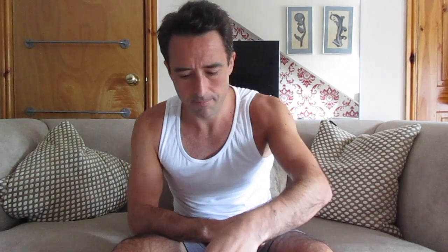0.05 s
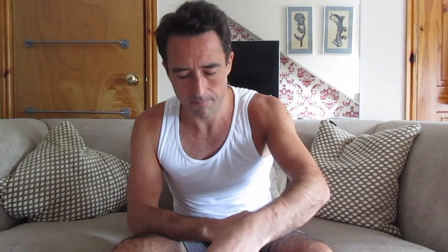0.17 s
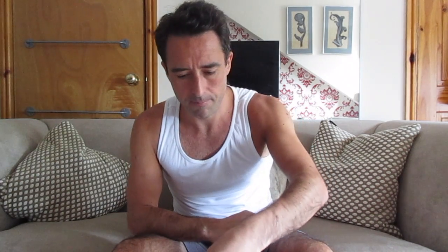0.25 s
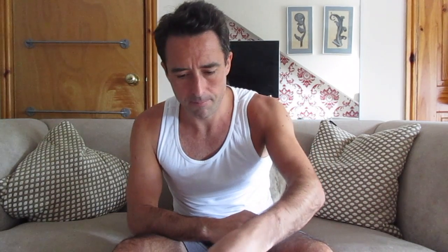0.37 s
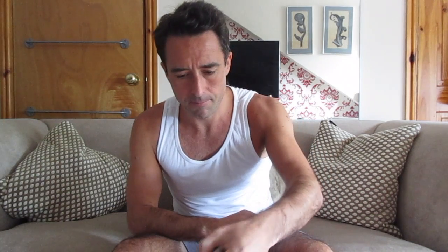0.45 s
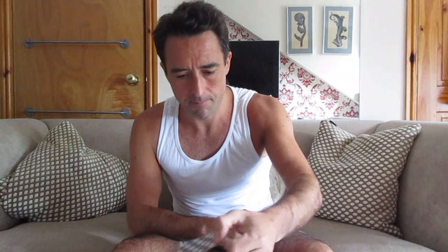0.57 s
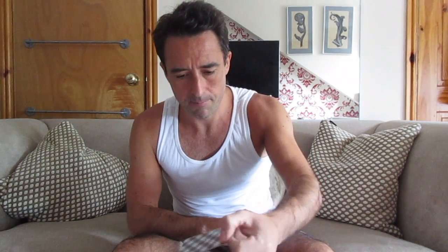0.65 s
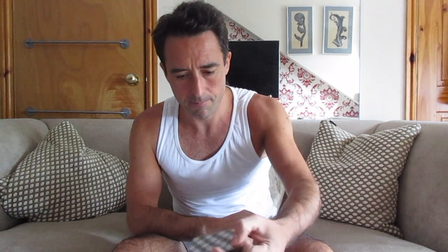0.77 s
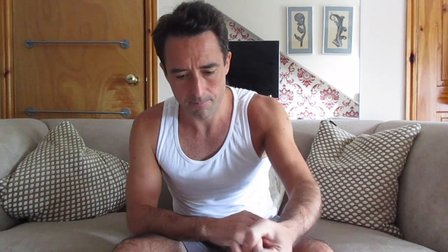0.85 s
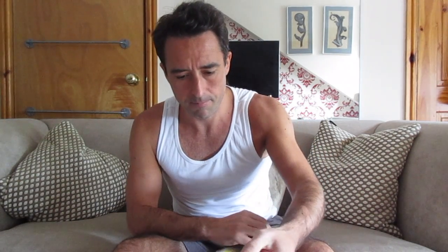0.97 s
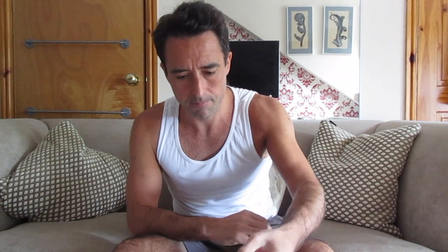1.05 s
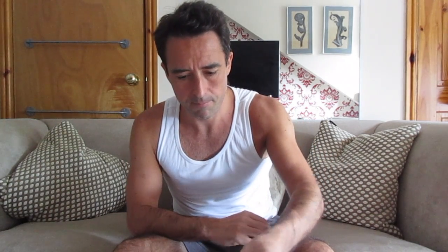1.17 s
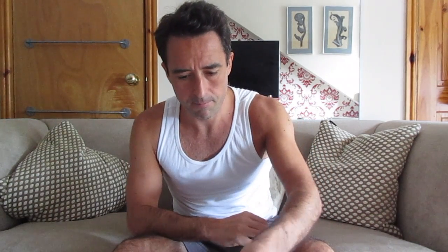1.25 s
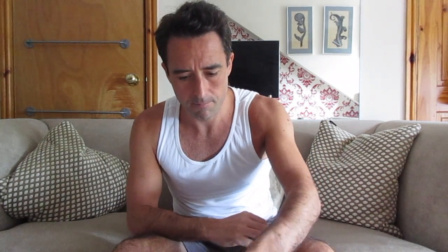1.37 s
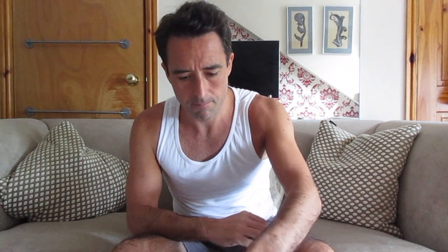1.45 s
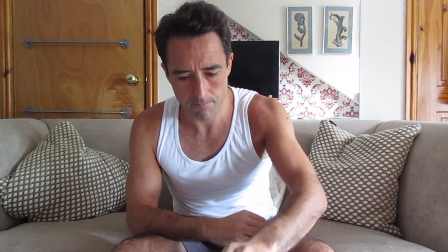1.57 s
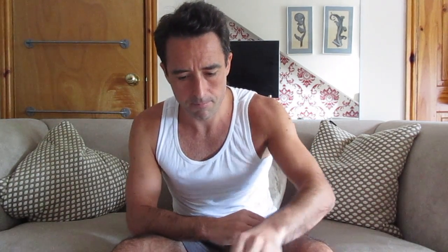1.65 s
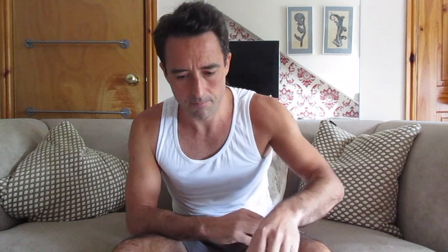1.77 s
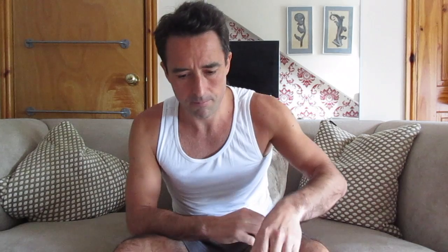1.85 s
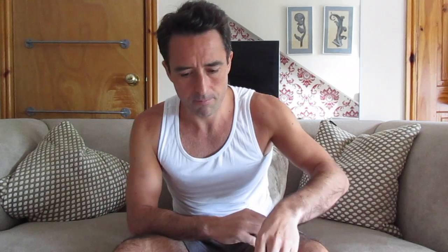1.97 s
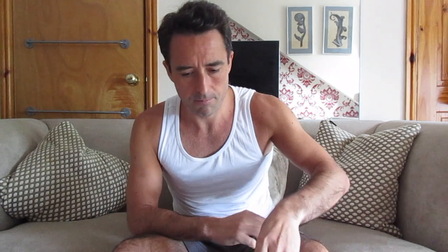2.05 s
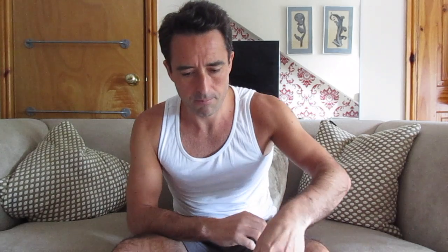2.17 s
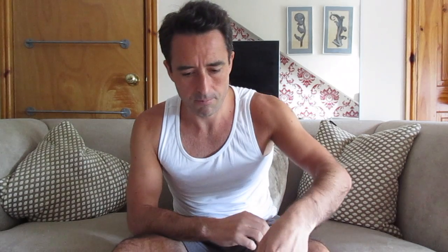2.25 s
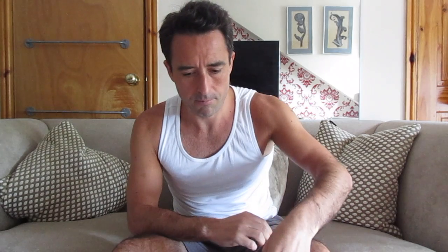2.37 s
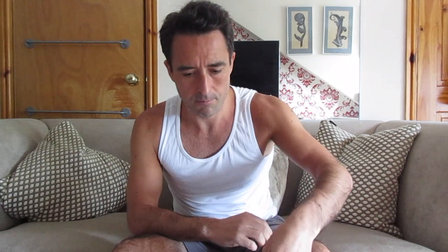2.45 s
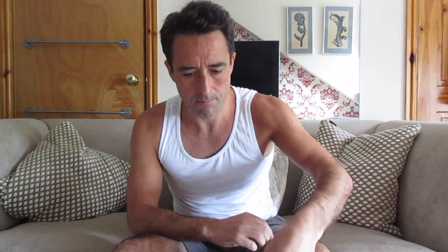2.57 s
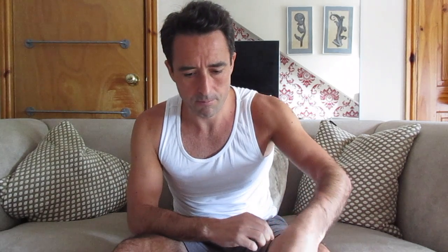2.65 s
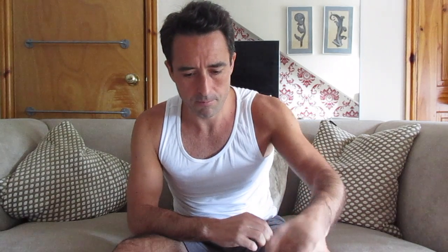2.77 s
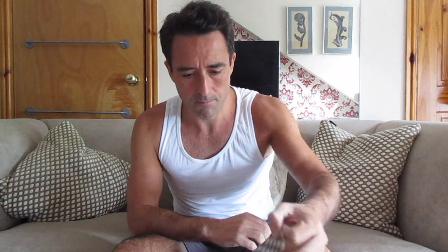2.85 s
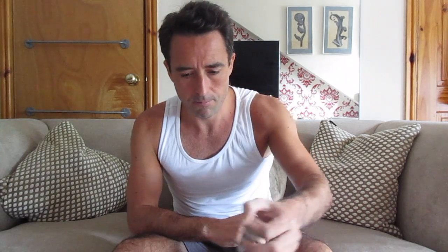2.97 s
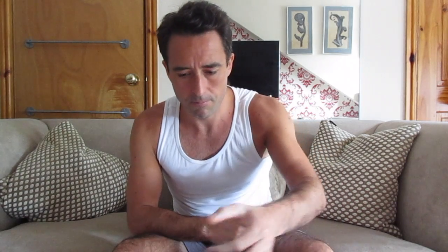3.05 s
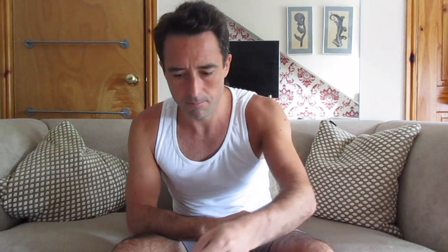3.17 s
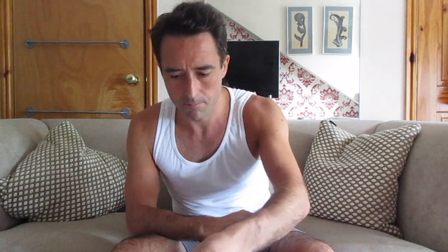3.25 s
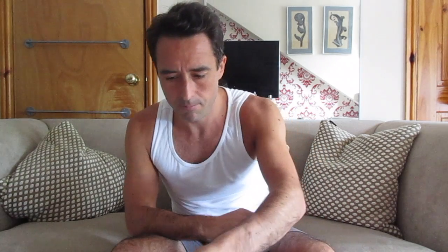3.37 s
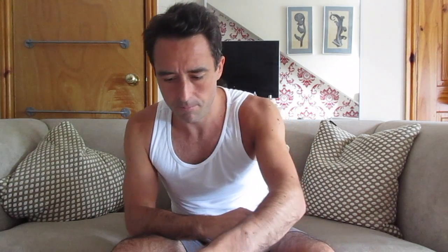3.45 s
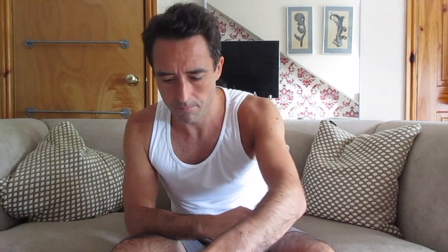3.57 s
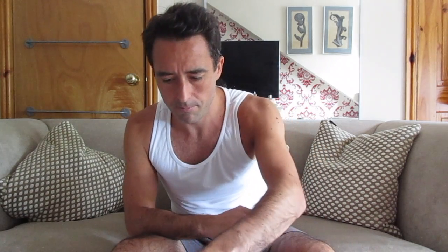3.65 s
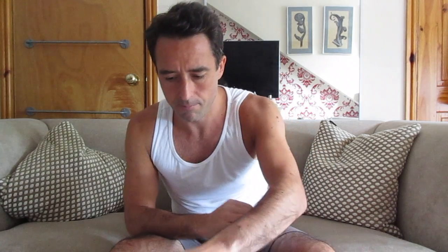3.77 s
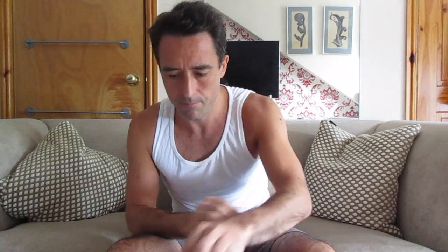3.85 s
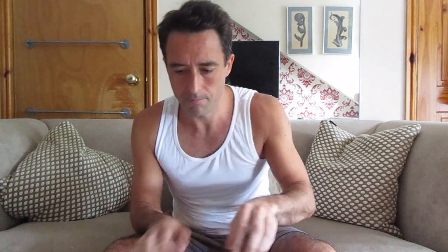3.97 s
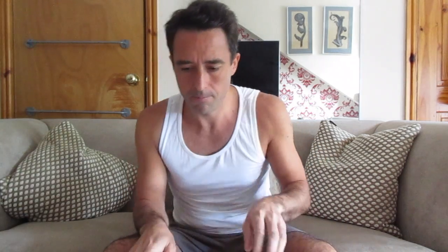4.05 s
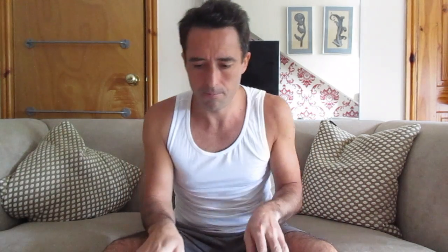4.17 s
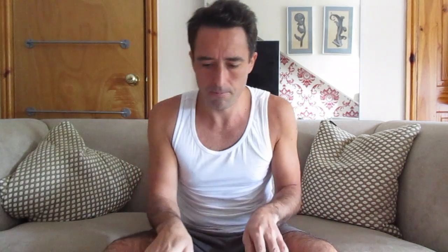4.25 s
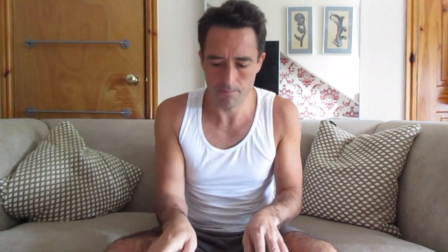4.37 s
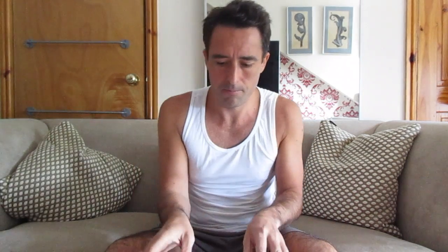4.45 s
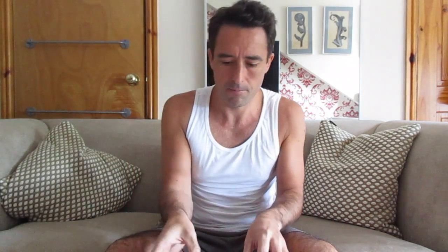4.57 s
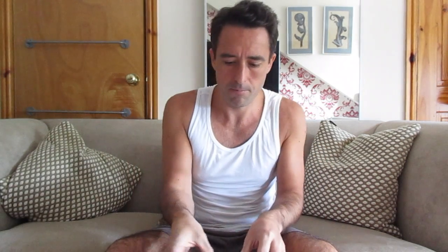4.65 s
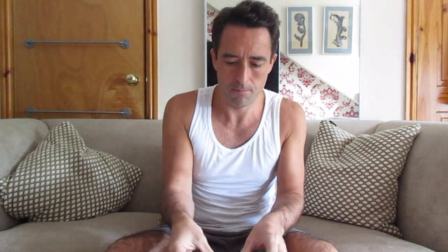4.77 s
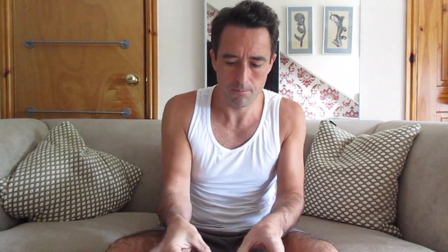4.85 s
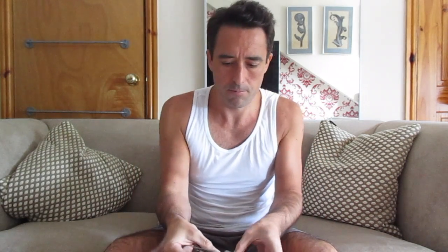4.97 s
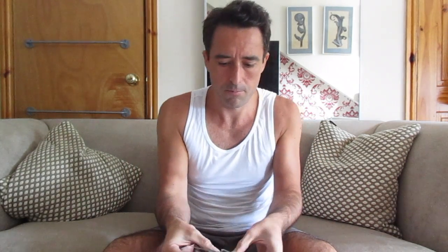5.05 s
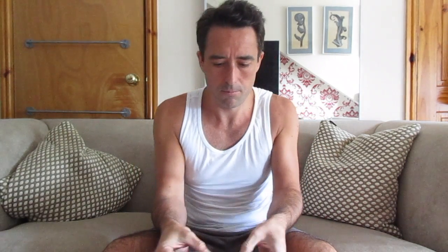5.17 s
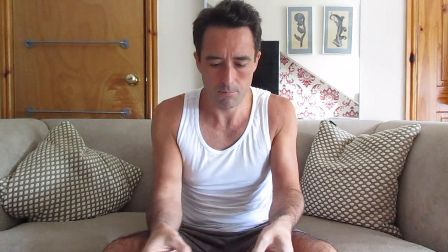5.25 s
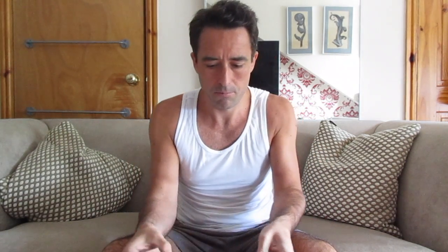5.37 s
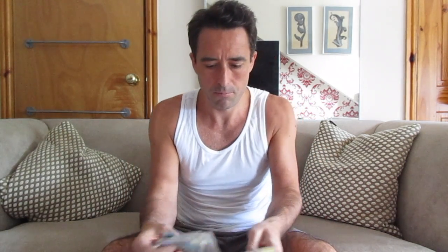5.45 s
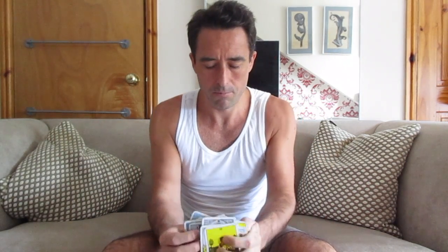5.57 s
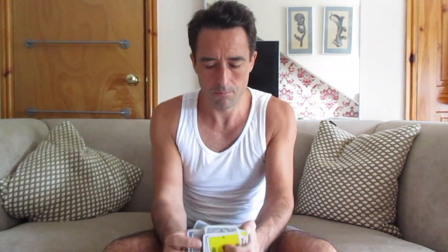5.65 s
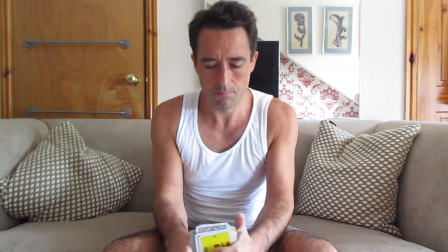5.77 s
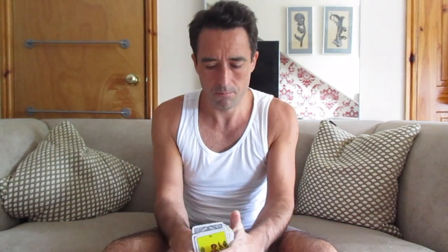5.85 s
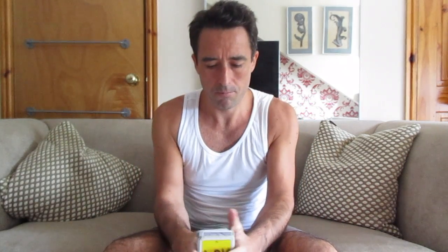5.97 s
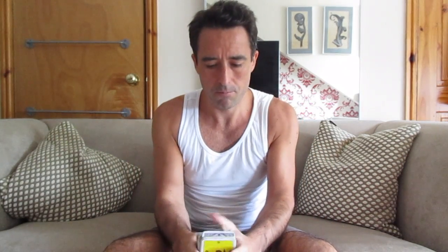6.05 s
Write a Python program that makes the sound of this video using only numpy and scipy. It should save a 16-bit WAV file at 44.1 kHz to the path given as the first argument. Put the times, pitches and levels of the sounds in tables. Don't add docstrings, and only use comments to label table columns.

```python
import sys
import numpy as np
from scipy import signal
from scipy.fft import rfft, irfft
from scipy.io import wavfile
from scipy.ndimage import uniform_filter1d

SR = 44100
rng = np.random.default_rng(int(sys.argv[2]) if len(sys.argv) > 2 else 0)


def makeup_ratio(level_db):
    decades = np.asarray(level_db, float) / 20
    return 10 ** decades


def to_wav(sig):
    pcm = np.clip(np.atleast_2d(sig), -1, 1) * 32767
    pcm = np.round(pcm).astype(np.int16)
    wavfile.write(sys.argv[1], SR, pcm.T)


N = 269892

# pitch_hz, level_db (per Hz)
FIZZ = [(300, 0), (1000, 1.5), (2500, -2), (5000, -1.5), (8000, -5), (11000, -10), (15000, -18.5)]
# pitch_hz, level_db, t60_s (time to die by 60 dB)
TABLE_MODES = [(250, -14, 0.074), (408, -4, 0.1), (483.4, 4.5, 0.14), (515, 1, 0.18), (655, -2, 0.12),
               (701, 5, 0.09), (744, 10, 0.053), (809, 4.5, 0.063), (1124, 6.5, 0.03), (1087, -1, 0.12),
               (1175, -2, 0.12)]


def evened(x):
    return x / np.sqrt(np.mean(x ** 2) + 1e-20)


def read(points, hz):
    point_hz, value = np.transpose(points)
    return np.interp(np.log(hz + 1), np.log(point_hz + 1), value)


def coloured(x, points):
    gain = makeup_ratio(read(points, np.fft.rfftfreq(len(x), 1 / SR)))
    return irfft(rfft(x) * gain, len(x))


def add(mix, s, sound):
    part = mix[round(s * SR):][:len(sound)]
    part += sound[:len(part)]


def resonate(x, hz, width_hz):
    turn = np.exp(2j * np.pi * np.cumsum(hz * np.ones(len(x))) / SR)
    r = np.exp(-np.pi * width_hz / SR)
    smooth = signal.lfilter([1 - r], [1, -r], x / turn)
    return 2 * (turn * smooth).real


def ring(modes, extra_db=0, rise_ms=0.073, size=6000):
    t = np.arange(size) / SR
    hz, db, t60 = np.transpose(modes)[:, :, None]
    wide_gap = np.diff(np.log(hz), axis=0, prepend=0) > .17
    sign = (-1.) ** np.cumsum(wide_gap, axis=0)
    tones = sign * makeup_ratio(db + extra_db - 60 * t / abs(t60)) * np.sin(2 * np.pi * hz * t)
    out = tones.sum(0) * (1 - np.exp(-(1000 * t / rise_ms) ** 2))
    return out / abs(out).max()


def puff(t, t60):
    return evened(coloured(rng.standard_normal(len(t)), FIZZ)) * makeup_ratio(-60 * t / t60)


def swell(rows, t):
    s, db, rise_ms, fall_ms = np.transpose(rows)[:, :, None]
    ms = 1000 * (t - s)
    away = np.where(ms < 0, -ms / np.maximum(rise_ms, 2), ms / np.maximum(fall_ms, 2))
    return np.sqrt((makeup_ratio(db - 10 * away) ** 2).sum(0))


def background():
    # pitch_hz, level_db (per Hz)
    hiss_colour = [(13, -33), (22, 7), (64, -10), (111, -3), (370, -11.5), (1050, -14.5), (3060, -23),
                   (15400, -33.5)]
    # pitch_hz, width_hz, level_db (rms)
    low_hum = (43.5, 7, -58)
    # pitch_hz, level_db (rms)
    whine_tones = [(7854, -74), (7881, -77), (7940, -76), (7973, -84), (8032, -94), (8091, -79)]
    hiss_db = -50.5
    t = np.arange(N) / SR
    rates_hz = np.geomspace(.3, 12, 24)
    drift = evened(sum(np.sin(2 * np.pi * (f * t + rng.random())) / np.sqrt(f) for f in rates_hz))
    hiss = makeup_ratio(hiss_db + .6 * drift) * evened(coloured(rng.standard_normal(N), hiss_colour))
    hum_hz, hum_width_hz, hum_db = low_hum
    hum = makeup_ratio(hum_db) * evened(resonate(rng.standard_normal(N), hum_hz, hum_width_hz))
    whine = np.zeros(N)
    for hz, db in whine_tones:
        whine += np.sqrt(2) * makeup_ratio(db) * np.sin(2 * np.pi * (hz * t + rng.random()))
    return hiss + hum + whine


def strokes():
    # peak_s, level_db, rise_ms, fall_ms
    glides = [(.175, -48.5, 34, 60), (.34, -41.5, 33, 43), (.49, -47.5, 91, 31), (.825, -47.5, 33, 24),
              (.94, -35, 7.9, 10.4), (1.36, -47, 25, 44), (1.435, -37.5, 13.4, 14), (1.51, -44, 34, 12),
              (1.98, -55, 62, 63), (2.165, -52, 51, 60), (2.54, -51, 130, 92), (2.74, -45, 86, 27),
              (2.845, -47.5, 11, 31), (3.04, -41.5, 30, 55), (3.37, -47, 30, 45), (3.575, -57, 65, 30),
              (3.675, -49, 14, 50), (3.76, -54, 38, 33), (3.95, -57.5, 170, 70)]
    # peak_s, level_db, rise_ms, fall_ms, gap_hz
    scrapes = [(.19, -52, 30, 23, 2400), (.245, -46.5, 12, 10, 2200), (.335, -43.5, 28, 24, 2260),
               (.385, -48.5, 37, 21, 2830), (.425, -45, 32, 30, 2190), (.826, -49, 22, 64, 1780),
               (0.955, -43, 17, 21, 1860), (1.39, -42.5, 42, 42, 2100), (1.43, -40, 15, 14, 2570),
               (3.644, -35.5, 6.8, 6.1, 1600), (2.76, -45.5, 22, 14, 2220), (2.843, -42, 6.6, 15, 2100),
               (3.045, -48, 20, 10, 1830), (3.37, -51, 30, 99, 2100), (3.585, -41, 46, 12, 2050),
               (3.654, -35, 17, 18, 2400), (4.55, -49, 124, 64, 2350), (4.67, -61, 44, 120, 2250),
               (4.95, -40, 9.9, 35, 2660), (5.225, -51, 27, 50, 1600), (5.56, -42, 14, 29, 2530),
               (5.635, -49, 6.9, 13.5, 2020), (5.795, -43.5, 66, 55, 1590), (5.975, -39.5, 6.7, 47, 1690)]
    # peak_s, level_db, rise_ms, fall_ms
    drags = [(.44, -47, 28, 30), (.485, -43.5, 20, 12), (.826, -51.5, 40, 56), (1.44, -46, 34, 33),
             (1.97, -55, 41, 33), (2.761, -47, 6.2, 13), (3.36, -53, 20, 66), (3.57, -51, 80, 30),
             (3.645, -46.5, 25, 44), (4.1, -54.5, 110, 170), (4.32, -56, 80, 100), (4.49, -46, 81, 36),
             (4.6, -44, 20, 100), (4.69, -47, 54, 38), (4.9, -42, 56, 21), (4.98, -45, 13, 77),
             (5.2, -55, 9.6, 170), (5.41, -72, 43, 43), (6.03, -40, 53, 54)]
    # peak_s, level_db, rise_ms, fall_ms
    pushes = [(4.189, -49, 10, 29), (4.31, -49, 97, 68), (4.55, -42.5, 63, 210), (4.68, -41, 104, 28),
              (4.85, -55, 60, 130), (4.945, -47.5, 8.2, 39), (5.081, -54.5, 83, 60), (5.21, -48, 35, 72),
              (5.4, -50.5, 80, 105), (5.555, -45, 40, 66), (5.66, -39.5, 50, 22), (5.79, -47.5, 75, 55),
              (5.99, -39.5, 16, 19), (6.115, -50, 92, 20)]
    glide_hz, glide_gap_db = 2100, -12
    push_gap_db, push_drum_db = -8, -14.5
    scrape_fizz_db, scrape_drum_db = -32.5, -32

    slips = rng.standard_normal((3, N)) * makeup_ratio(1.8 * np.minimum(rng.exponential(1, (3, N)), 6))
    clumps = evened(uniform_filter1d(rng.standard_normal((3, N)), 130))
    slips *= makeup_ratio([[1.7], [2.2], [2.6]] * clumps)
    fizz = evened(coloured(slips[0], FIZZ))
    drum = evened(signal.oaconvolve(slips[1], ring(TABLE_MODES))[:N])
    flutter = uniform_filter1d(uniform_filter1d(rng.standard_normal(N), 400), 400)
    wander = 2 ** (.09 * evened(flutter))

    def gap(at, hz):
        hz = hz * wander[at]
        wide = resonate(resonate(slips[2, at], 1690, 1600), 1640, 3600)
        return evened(resonate(resonate(slips[2, at], hz, 600), hz, 1200) + 0.35 * wide)

    t, coarse = np.arange(N) / SR, np.arange(0, N / SR, .001)
    glide, push, drag = (np.interp(t, coarse, swell(rows, coarse)) for rows in (glides, pushes, drags))
    sing = gap(slice(None), glide_hz)
    out = glide * (fizz + makeup_ratio(glide_gap_db) * sing) + drag * drum
    out += push * (fizz + makeup_ratio(push_gap_db) * sing + makeup_ratio(push_drum_db) * drum)
    for *row, hz in scrapes:
        at = slice(max(round((row[0] - .25) * SR), 0), round((row[0] + .3) * SR))
        scrape = gap(at, hz) + makeup_ratio(scrape_fizz_db) * fizz[at] + makeup_ratio(scrape_drum_db) * drum[at]
        out[at] += swell([row], t[at]) * scrape
    return out


def clicks():
    # start_s, peak_db, centre_hz
    catches = [(0.228, -29, 3000), (0.2836, -38, 1900), (0.4824, -20.5, 1580), (0.4945, -34, 1990),
               (0.8954, -37, 2280), (2.6973, -33, 2280), (2.986, -40, 2030), (3.208, -37, 2170),
               (3.544, -40, 1740), (3.6795, -33, 2500), (3.817, -37, 2150), (4.181, -30, 2600),
               (5.2799, -34, 1810), (5.4153, -43, 2420), (1.4252, -29, 1500), (5.4982, -39, 1400),
               (5.5521, -30, 2330), (5.6072, -26.5, 2270), (5.7892, -23, 1830), (5.8744, -29.5, 1490),
               (5.9611, -27, 2610), (5.9698, -22, 2420), (5.9775, -19.5, 2410), (6.0014, -22, 1410),
               (6.0445, -27, 1400), (6.0644, -29.5, 2480)]
    out, t = np.zeros(N), np.arange(400) / SR
    for s, db, hz in catches:
        front = np.cos(2 * np.pi * 6500 * t) * np.exp(-t / .00006) + .25 * puff(t, .006)
        click = np.sin(2 * np.pi * hz * t) * np.exp(-1.1 * hz * t) + 0.53 * front
        add(out, s, makeup_ratio(db) * click / abs(click).max())
    return out


def squeals():
    # start_s, length_ms, level_db, start_hz, end_hz
    slides = [(.302, 22, -48, 1750, 2100), (.318, 26, -44, 2250, 2050), (.356, 36, -49, 2600, 2900),
              (.4, 36, -45, 2500, 2200), (.33, 30, -50, 5200, 5500), (.428, 25, -52, 1500, 1200),
              (3.632, 18, -40, 2300, 1900), (3.645, 18, -33, 2800, 3050), (3.653, 12, -33, 2800, 2350),
              (3.66, 15, -40, 3000, 2900), (3.68, 30, -47, 2900, 3050), (3.57, 16, -50, 3800, 4100),
              (4.534, 24, -40, 2650, 2700), (4.588, 10, -46, 4200, 4150), (4.615, 100, -52, 5000, 4900),
              (4.63, 50, -53, 6700, 6400), (4.63, 60, -47, 2200, 2500), (4.49, 20, -48, 2100, 2300),
              (4.56, 50, -48, 2800, 2650), (5.631, 8, -40, 1500, 1500)]
    width_at_2500_hz, purity = 380, .35
    out = np.zeros(N)
    for s, ms, db, from_hz, to_hz in slides:
        u = np.linspace(0, 1, max(round(ms * SR / 1000), 64))
        hz = from_hz + (to_hz - from_hz) * u
        width = width_at_2500_hz * from_hz / 2500
        fuzz = evened(resonate(resonate(rng.standard_normal(len(u)), hz, width), hz, 2 * width))
        tone = np.sqrt(2) * np.sin(2 * np.pi * np.cumsum(hz) / SR)
        rounded = np.sqrt(np.sin(np.pi * u ** .8))
        add(out, s, makeup_ratio(db) * rounded * evened(purity * tone + fuzz))
    return out


def ticks():
    # start_s, peak_db, pitch_hz
    corners = [(3.671, -40, 10500), (3.6745, -44, 7500), (3.6808, -35, 7000), (3.6843, -36, 7500),
               (3.7425, -38, 9500), (3.746, -40, 7500), (.9345, -36, 9900), (.9385, -40, 11000),
               (.809, -44, 9000), (5.6072, -34, 6000), (5.672, -30, 6500), (5.6868, -24, 6000)]
    out, t = np.zeros(N), np.arange(200) / SR
    for s, db, hz in corners:
        tick = np.sin(2 * np.pi * hz * t) * t * np.exp(-0.7 * hz * t)
        add(out, s, makeup_ratio(db) * tick / abs(tick).max())
    return out


def snaps():
    # start_s, peak_db, ring_hz, t60_s
    crisp = [(0.823, -35.5, 1610, 0.03), (1.425, -28.5, 815, 0.023), (1.436, -36, 1070, 0.011),
             (1.462, -25, 2470, 0.023), (1.527, -32.5, 2900, 0.02), (2.84, -41, 1690, 0.02),
             (3.339, -35.5, 1060, 0.046), (3.366, -47, 2530, 0.03), (5.182, -30.5, 990, 0.028),
             (5.556, -24.5, 2560, 0.024), (6.114, -22, 2340, 0.0081)]
    # start_s, peak_db, ring_hz,
    # t60_s
    soft = [(2.757, -35, 764, 0.06), (0.952, -32.5, 2005, 0.072), (1.103, -31, 1110, 0.013),
            (1.161, -34, 1960, 0.032), (1.25, -23.5, 1040, 0.017), (1.254, -31.5, 1380, 0.023),
            (2.757, -32, 2150, 0.034), (2.764, -25.5, 1463, 0.035), (2.843, -25.5, 1240, 0.025),
            (3.334, -32.5, 1460, 0.021), (3.574, -34.5, 1340, 0.043), (3.672, -35.5, 258, 0.053),
            (3.6598, -27, 2415, 0.012), (4.548, -33, 2600, 0.02), (4.572, -30.5, 1080, 0.045),
            (4.59, -28, 1125, 0.03), (4.608, -33, 700, .04), (4.66, -33, 750, .04),
            (4.691, -31, 1067, 0.06), (5.192, -31.5, 1140, 0.028), (5.212, -31.5, 2620, 0.021),
            (5.231, -31, 1420, 0.027), (5.6955, -30, 2200, .07), (5.686, -26, 2000, .1),
            (5.684, -22, 2300, .06), (5.704, -33, 2600, .06), (5.718, -36, 1850, .1),
            (5.752, -36, 2400, .05), (5.809, -26, 520, .09), (5.855, -38, 1100, .1)]
    out, t = np.zeros(N), np.arange(3000) / SR
    for rows, tick_db, fuzz in ((soft, -49, 0.59), (crisp, -9.5, 0.74)):
        for s, db, hz, t60 in rows:
            paper = resonate(resonate(rng.standard_normal(len(t)), 1.15 * hz, 1200), hz, 2500)
            body = np.sin(2 * np.pi * hz * t) + fuzz * evened(paper)
            body *= makeup_ratio(-60 * t / max(t60, .004)) * np.minimum(t / 0.00017, 1)
            add(out, s, makeup_ratio(db) * (body / abs(body).max() + makeup_ratio(tick_db) * puff(t, 0.011)))
    return out


def rings():
    # start_s, peak_db, pitch_hz, t60_s
    freed = [(5.695, -17, 1392, .07), (5.685, -22, 1830, .14), (5.682, -14, 2420, .06),
             (5.689, -19, 2560, .07), (5.703, -27, 2650, .06), (5.717, -30, 2360, .11),
             (5.731, -31, 2530, .07), (5.716, -24, 520, .1), (5.668, -24, 2900, .04),
             (1.102, -37, 2050, .02), (1.101, -40, 600, .02), (3.084, -33, 1800, .04),
             (3.09, -34, 2150, .05), (4.948, -36, 2420, .12), (4.968, -35, 1120, .07)]
    out = np.zeros(N)
    for s, db, hz, t60 in freed:
        add(out, s, makeup_ratio(db) * ring([(hz, 0, t60)], rise_ms=1.6))
    return out


def knocks():
    # start_s, peak_db, tilt_db (to high tones), crack_db, free_ms (until damped)
    blows = [(1.387, -36, 1, -1, 6.2), (1.439, -29.5, -30, -14, 45), (1.465, -30, -17, -19, 17),
             (4.9445, -26, -4, -12, 5.7), (4.924, -43, 7, -5, 11), (5.6407, -2, 3, -23.5, 11),
             (5.667, -0.5, 5.5, -21, 17), (5.6807, -6.5, -12, -9.5, 6.2), (5.6838, 1.5, 12, -14, 8),
             (5.692, -14, -14, -14, 11), (5.7155, -19, 8, -20, 16), (5.768, -27, 6, -22, 6.5),
             (5.779, -27, 1.5, -14, 9), (5.789, -13.5, 5, -13.5, 9), (5.8053, -16.5, 9, -30, 11),
             (5.8279, -13.5, 3.5, -38, 9.1), (5.984, -18, 7, -14, 16), (5.991, -19.5, 7, -20, 4.1),
             (6, -10, -1, -21, 7.7), (6.014, -20.5, -21, -30, 6.2), (6.026, -40, -3, -20, 8),
             (6.111, -25, -2.5, -25, 13)]
    # pitch_hz, level_db, t60_s
    free_modes = [(484, 0, 0.073), (722, 4.5, 0.1), (1101, 1, 0.14), (1260, -20, 0.04)]
    # pitch_hz, level_db, t60_s
    crack_modes = [(1400, -4.5, 0.12), (1830, -7.5, 0.072), (1994, -10, 0.11), (2370, 6.5, 0.022),
                   (2620, 9, 0.0091), (3140, -7, 0.025), (3310, -13, 0.014), (3720, -7, 0.015)]
    stiffen = .005
    out, t = np.zeros(N), np.arange(6000) / SR
    side = np.array([-1, 0, 1, 1])[:, None]
    hz = np.transpose(TABLE_MODES)[0][:, None]
    for s, db, tilt_db, crack_db, free_ms in blows:
        free = np.exp(-(1000 * t / max(free_ms, 2)) ** 4)
        paper = evened(resonate(resonate(rng.standard_normal(len(t)), 2300, 1400), 2100, 2200))
        paper *= makeup_ratio(-60 * t / 0.2)
        crack = ring(crack_modes, 2.7 * rng.standard_normal((len(crack_modes), 1)), rise_ms=2.1)
        crack += 0.31 * paper * np.minimum(t / 0.0011, 1)
        sharper = 1 + stiffen * np.clip(tilt_db - 4, -6, 10)
        blow = ring(free_modes * np.array([sharper, 1, 1]), side * tilt_db, rise_ms=1.05)
        varied = TABLE_MODES * (1 + [.015, 0, .2] * rng.standard_normal((len(TABLE_MODES), 3)))
        duller_db = -13 * np.log2(hz / 500) + 4 * rng.standard_normal(hz.shape)
        after = ring(varied, duller_db, rise_ms=6.4)
        add(out, s, makeup_ratio(db) * (free * blow + (0.23 + free) * makeup_ratio(crack_db) * crack + 0.06 * after))
    return out


def air_pops(rows, modes, ring_db):
    pops, t = np.zeros(N), np.arange(3000) / SR
    for s, db, hz, ms, puff_db in rows:
        pop = np.sin(2 * np.pi * hz * t) * np.minimum(t * hz * 1.2, 1) * makeup_ratio(-60000 * t / ms)
        add(pops, s, makeup_ratio(db) * (pop / pop.max() + makeup_ratio(puff_db) * puff(t, 0.013)))
    return pops + makeup_ratio(ring_db) * signal.oaconvolve(pops, ring(modes))[:N]


def pile_slaps():
    # start_s, peak_db, pop_hz, t60_ms, puff_db (over the pop)
    contacts = [
        (3.0287, -24, 420, 8, -20),
        (3.031, -25, 950, 9, -16),
        (3.0522, -18, 2300, 10, -7),
        (3.0541, -8, 740, 10, -39),
        (3.0574, -9, 1000, 6, -34),
        (3.0594, -12, 2200, 11, -40),
        (3.064, -24, 1750, 12, -9),
        (3.069, -22, 1836, 21, -17),
        (3.052, -33, 133, 33, -49),
        (3.033, -31, 1780, 10, 5),
    ]
    # pitch_hz, level_db, t60_s
    pile_modes = [(318, 9, 0.086), (400, 1, 0.05), (565, -11, .1), (735, -7, 0.12), (813, -2, 0.1),
                  (1136, -2, 0.08), (1233, -4, .08), (1389, 7, 0.08), (1775, 7, 0.08), (1830, -1, .13),
                  (2019, -2, .09), (2110, -1, 0.09), (2235, 1, 0.08), (2390, 0, .05)]
    return air_pops(contacts, pile_modes, -31)


def pack_drops():
    # start_s, peak_db, pop_hz, t60_ms, puff_db (over the pop)
    contacts = [
        (4.9372, -34, 900, 4, -10),
        (4.9391, -10.5, 1250, 2.8, -14.5),
        (4.9398, -26, 330, 20, -20),
        (4.94, -33, 180, 30, -30),
        (4.9405, -27, 3200, 4, -6),
        (4.9418, -19, 850, 10, -20),
        (4.951, -30, 760, 20, -19),
    ]
    # pitch_hz, level_db, t60_s
    bare_modes = [(410, 4, .09), (500, 0, .1), (745, 7, .08), (775, 3, .1), (1100, 0, .1), (1180, 0, .08),
                  (1420, -4, .05), (1750, -6, .06), (2400, -2, .1), (2620, -6, .05), (3200, -10, .04)]
    return air_pops(contacts, bare_modes, -38)


def room(x):
    # pitch_hz, t60_s
    decay = [(250, 0.21), (1000, 0.15), (3000, 0.19), (8000, 0.12)]
    taps = np.zeros(SR // 2)
    at = np.arange(300, len(taps) - 20, 20)
    taps[at + rng.integers(0, 20, len(at))] = rng.choice([-1., 1.], len(at))
    hz, t, z = signal.stft(taps, SR, nperseg=256)
    fading = z * makeup_ratio(-60 * t / read(decay, hz)[:, None])
    tail = signal.istft(fading, SR, nperseg=256)[1]
    return signal.fftconvolve(x, tail / np.linalg.norm(tail))[:N]


def scene():
    bass_cut = signal.butter(2, 170, "high", fs=SR, output="sos")
    cards = signal.sosfilt(bass_cut, clicks() + ticks() + snaps() + rings())
    blows = signal.sosfilt(bass_cut, knocks())
    hits = cards + pile_slaps() + pack_drops()
    rubs = strokes() + squeals()
    wet = room(makeup_ratio(-12) * hits + makeup_ratio(-17) * blows + makeup_ratio(-17) * rubs)
    return (background() + hits + blows + rubs + wet)[None]


def top_cut(x):
    return signal.sosfilt(signal.butter(12, 15550, fs=SR, output="sos"), x)


def record(dry):
    # pitch_hz, level_db
    mic = [(22, -1.5), (31, -8), (38, 0.5), (14000, -0.5), (15000, -7), (15600, -30), (17000, -61)]
    power_db = 10 * np.log10(abs(uniform_filter1d(dry[0] ** 2, 300)) + 1e-12)
    fall = np.arange(N) * 25.0 / SR
    held_db = np.maximum.accumulate(power_db + fall) - fall
    over_db = np.maximum(held_db + 15, 0)
    ducked = dry / makeup_ratio(.35 * signal.lfilter([.002], [1, -.998], over_db))
    finished = np.clip(coloured(ducked[0], mic)[None], -1, 1)
    return top_cut(finished)


dry = scene()
out = record(dry)
to_wav(out)
```